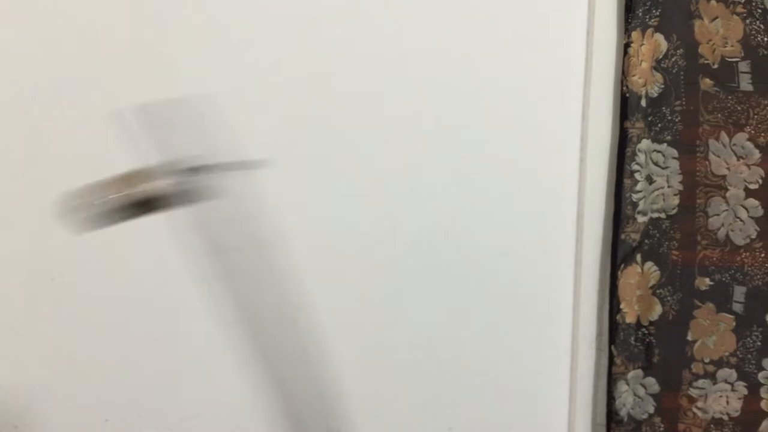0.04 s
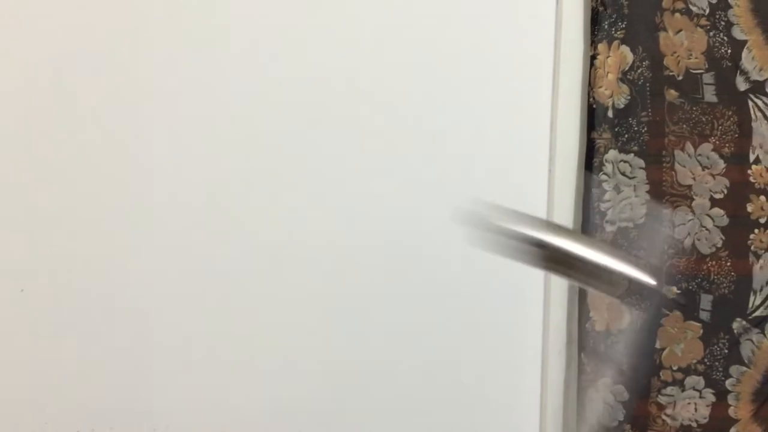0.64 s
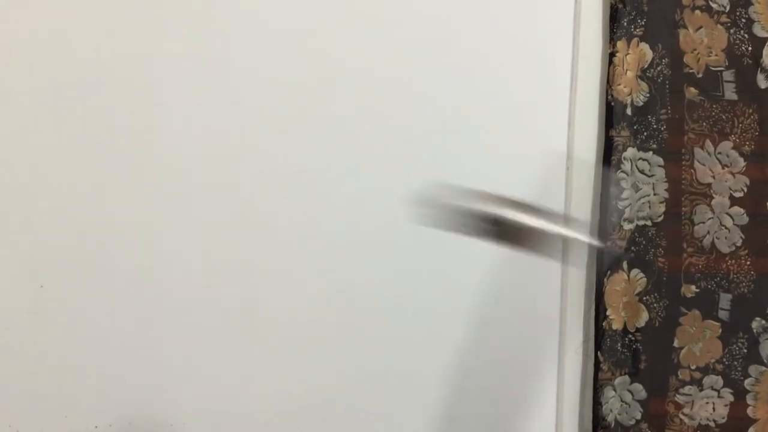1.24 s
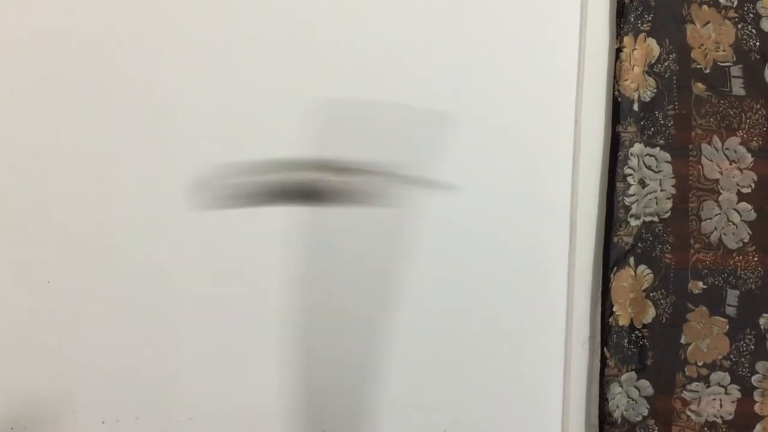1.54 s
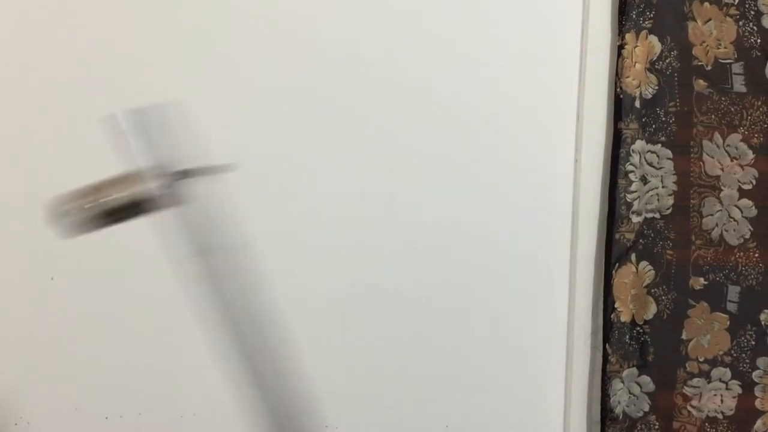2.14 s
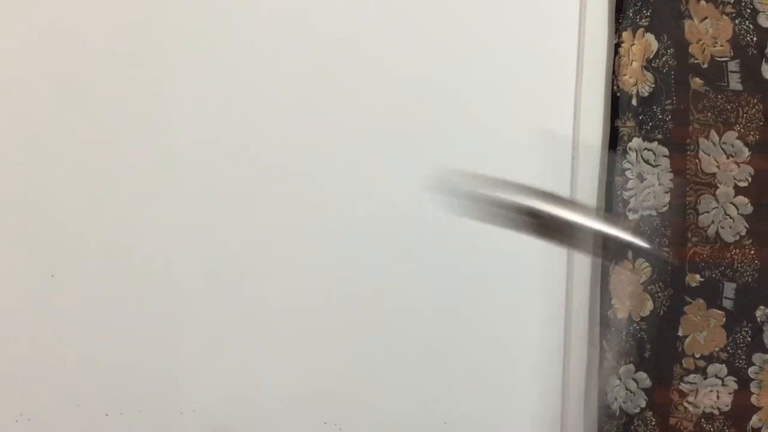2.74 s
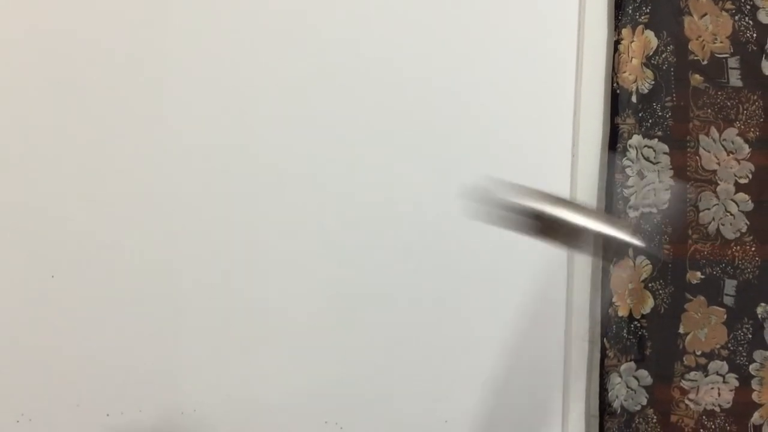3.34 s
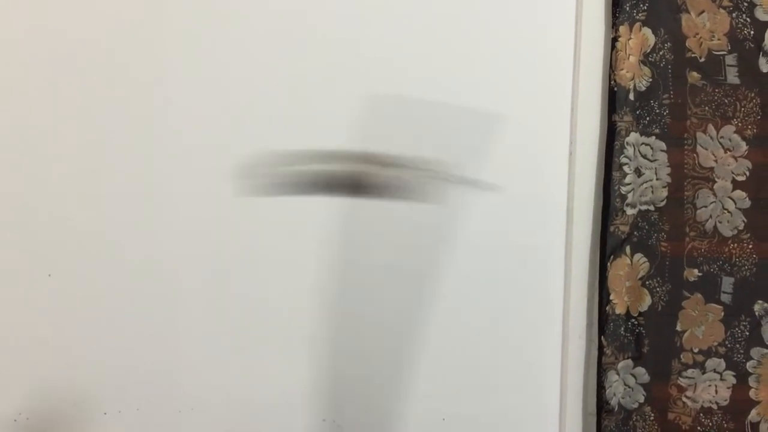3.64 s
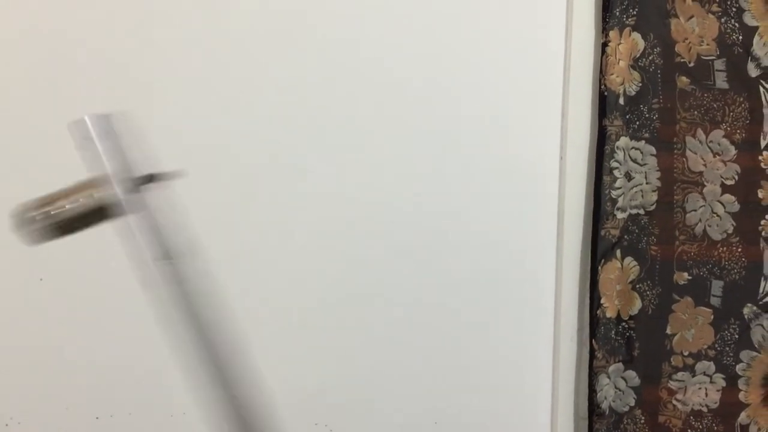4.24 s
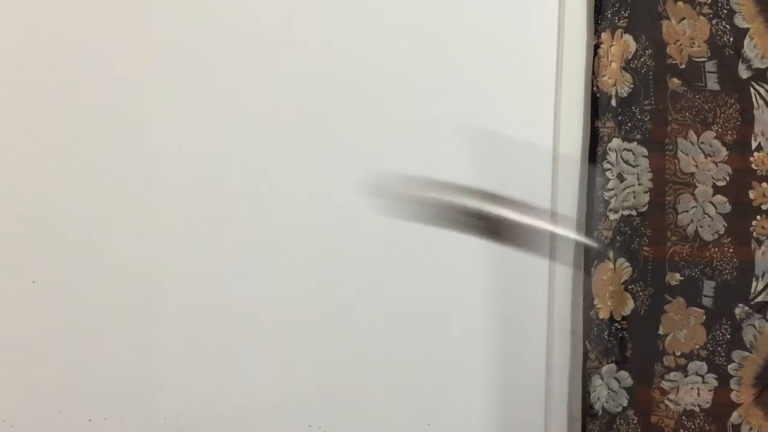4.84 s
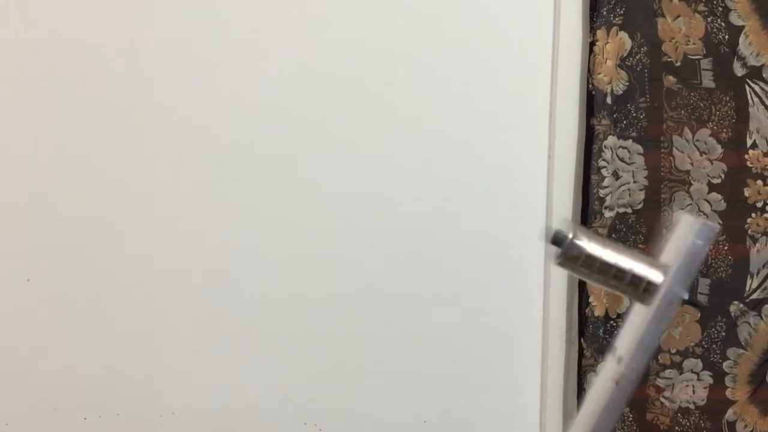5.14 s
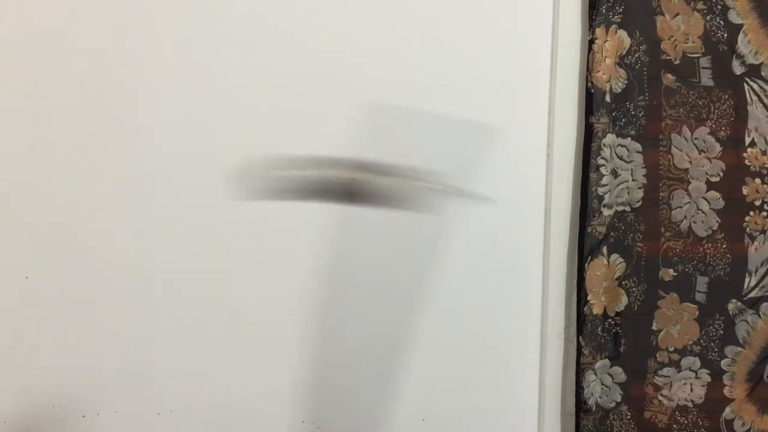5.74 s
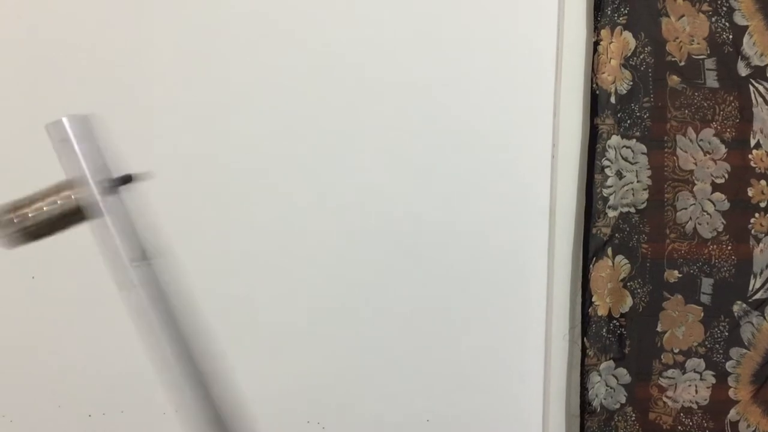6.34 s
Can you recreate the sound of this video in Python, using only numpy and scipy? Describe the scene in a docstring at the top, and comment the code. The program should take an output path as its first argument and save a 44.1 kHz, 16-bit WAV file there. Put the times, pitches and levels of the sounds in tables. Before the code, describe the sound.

Quick, regular metallic knocks and ticks from a loose, motor-driven crank and arm, over a steady hum and low rumble.

```python
"""A small electric motor swings a homemade crank and arm to and fro in a small room.
From the start the mains hum, the drive whirrs and the frame rumbles. Nearly four times a second the
slack pivot knocks and rebounds, a light contact ticks, and the loose link clacks and settles.
Midway a deeper rumble swells and sinks back; from there on the arm also scrapes briefly four times."""
import sys
import numpy as np
from scipy import signal
from scipy.fft import rfft, irfft, next_fast_len
from scipy.io import wavfile
from scipy.ndimage import uniform_filter1d

SR = 44100
rng = np.random.default_rng(int(sys.argv[2]) if len(sys.argv) > 2 else 0)


def store_pcm(level_fs):
    """Save levels as 16-bit WAV."""
    pcm = np.round(np.clip(level_fs, -1, 1) * 32767).astype(np.int16)
    wavfile.write(sys.argv[1], SR, np.atleast_2d(pcm).T)


N = 282240
TIME = np.arange(N) / SR
SIZE = next_fast_len(N + SR // 2)  # spare room for ringing to die away
FREQ = np.maximum(np.arange(SIZE // 2 + 1) * SR / SIZE, 1)
STROKE_S, FIRST_TICK_S = .26328, .1048  # a stroke runs from one tick to the next

# The pivot's knocks: (time [s], relative level [dB], extra low ring [dB], touch before the knock [dB])
KNOCK_PER_STROKE = [(.045, -35, 1, -40), (.297, -30, -3.5, -40), (.571, -37.5, -1, -43),
                    (.8226, -31.5, -4, -50), (1.100, -35, -3.5, -38), (1.3468, -31.5, -8.5, -47),
                    (1.628, -33, -5, -42), (1.8786, -31.5, 0.5, -41), (2.151, -36, -2, -37.5),
                    (2.411, -32.5, -6, -40), (2.673, -34, 0.5, -37), (2.940, -32, -4, -42),
                    (3.197, -32, -6, -46), (3.4685, -33.5, -2, -39), (3.7214, -29.5, -4.5, -50),
                    (3.997, -39, -1, -57), (4.243, -28.5, -6.5, -39), (4.525, -38.5, 1, -58),
                    (4.7694, -32, -3.5, -46), (5.050, -39, -0.5, -54), (5.298, -30.5, -6, -42),
                    (5.571, -33.5, -5, -56), (5.830, -30.5, -8, -46), (6.094, -32.5, -7.5, -47),
                    (6.358, -34, -6, -52)]


def undb(db):
    """Turn decibels into a gain."""
    return 10 ** (np.asarray(db) / 20)


def unit(x):
    """Scale to an average (rms) level of 1."""
    return x / np.sqrt(np.mean(x ** 2))


def steady(x, size):
    """Hold the level near 1 over every stretch of `size` samples."""
    return x / np.sqrt(uniform_filter1d(x ** 2, size))


def drift(rate_hz):
    """Smooth random wandering, about 1 up or down."""
    step = int(SR / rate_hz)
    stairs = np.repeat(rng.standard_normal(N // step + 1), step)
    return 1.3 * uniform_filter1d(stairs, step)[:N]


def stroke_starts():
    """When each stroke begins; the crank turns evenly."""
    return FIRST_TICK_S + STROKE_S * np.arange(len(KNOCK_PER_STROKE))


def once_a_stroke(at, width):
    """A smooth bump in every stroke; its place and width are shares of a stroke."""
    stroke = (TIME - FIRST_TICK_S) / STROKE_S
    distance = (stroke - at + .5) % 1 - .5
    return np.exp(-.5 * (distance / width) ** 2)


def spectrum(points):
    """Gain at each frequency, from a line through (frequency [Hz], level [dB]) points."""
    hz, db = np.transpose(points)
    return undb(np.interp(np.log(FREQ), np.log(hz), db))


def resonances(modes, skirt):
    """Gain peaks at a body's ringing notes (modes), falling faster beyond `skirt` times their pitch."""
    power = sum(undb(2 * db) / (1 + (2 * (FREQ - hz) / width) ** 2)
                / (1 + ((FREQ - hz) / (skirt * hz)) ** 2) for hz, width, db in modes)
    return np.sqrt(power)


def ring(x, gain):
    """Colour a sound with a gain curve; white noise keeps its level."""
    gain = unit(gain)
    # Folding the cepstrum puts all the ringing after a hit, none before it.
    cepstrum = irfft(np.log(gain + 1e-6), SIZE)
    cepstrum[1:SIZE // 2] *= 2
    cepstrum[SIZE // 2 + 1:] = 0
    response = np.exp(rfft(cepstrum))
    return irfft(rfft(x, SIZE) * response, SIZE)[:N]


def contacts(times, levels_db, chatter_s, room_db, room_s):
    """Each contact is a burst of noise that builds up and chatters; the room's echo trails after it."""
    out, t = np.zeros(N + SR), np.arange(SR // 3) / SR
    rise = 1 - np.exp(-t / .0012)
    shape = rise * np.hypot(np.exp(-t / chatter_s), undb(room_db) * np.exp(-t / room_s))
    for s, db in zip(times, levels_db):
        start = int(np.clip(s * SR, 0, N))
        out[start:start + len(t)] += undb(db) * shape * rng.standard_normal(len(t))
    return out[:N]


def repeats(s, db, low_ring_db, scatter_s, scatter_db):
    """Blows that are never quite alike: (time [s], level [dB], extra low ring [dB])."""
    chance = rng.standard_normal((len(s), 3)).T
    return np.column_stack([s + scatter_s * chance[0], db + scatter_db * chance[1],
                            low_ring_db + scatter_db * chance[2]])


def blows(rows, body, high_db, low_db, lag_s, **decay):
    """A struck body rings: its stiff high notes answer at once, its low bending notes a moment later."""
    s, db, low_ring_db = np.transpose(rows)
    low_share = 1 / (1 + (FREQ / 3450) ** 24)  # low and high part at 3450 Hz
    high = ring(contacts(s, db, **decay), body * np.sqrt(1 - low_share))
    low = ring(contacts(s + lag_s, db + low_ring_db, **decay), body * np.sqrt(low_share))
    return undb(high_db) * high + undb(low_db) * low


def motor():
    """The mains hum, bearings and gears whirr, and the crank groans softly as it takes the load."""
    # Hum tones: (frequency [Hz], level before swell and drift [dB])
    hum_tones = [(100, -52), (200, -63.5), (300, -56)]
    # Tone colour of the whirr: (frequency [Hz], relative level [dB])
    whirr_colour = [(190, -24.5), (330, -12), (589, -7), (813, -5), (1280, -8), (1410, -9.5), (1760, -8),
                    (2640, -10), (2900, -8.5), (3820, -12), (4140, -13), (5020, -22.5), (5620, -27),
                    (6710, -30.5), (15500, -38.5)]
    # Ringing notes of the motor housing: (frequency [Hz], width [Hz], relative level [dB])
    housing_modes = [(374, 66, 3), (660, 19, -0.5), (826, 14, -7), (1030, 42, 4), (1250, 14, 5),
                     (1621, 8.7, 8.5), (8300, 99, 2), (11050, 43, -17), (14700, 280, -2)]
    # Low notes of the loaded crank: (frequency [Hz], width [Hz], relative level [dB])
    groan_modes = [(415, 44, 2), (420, 22, -7.5)]
    swell_db = 2 * once_a_stroke(at=.92, width=.076)  # as the arm swings back
    hum = np.zeros(N)
    for hz, db in hum_tones:
        peak = np.sqrt(2) * undb(db + swell_db + 2 * drift(2.97))
        hum += peak * np.sin(2 * np.pi * (hz * TIME + rng.random()))
    housing = np.hypot(1, resonances(housing_modes, skirt=.022))
    whirr = unit(ring(rng.standard_normal(N), spectrum(whirr_colour) * housing))
    groan = unit(ring(rng.standard_normal(N), resonances(groan_modes, skirt=.11)))
    groan *= once_a_stroke(at=.533, width=.056)
    flutter_db = .42 * drift(5) + 1.3 * drift(60)
    return hum + undb(-49 + flutter_db) * whirr + undb(-56.5) * groan


def frame():
    """The drive shakes the frame, hardest as the arm swings back; a deeper rumble swells midway."""
    # Ringing notes of the frame: (frequency [Hz], width [Hz], relative level [dB])
    frame_modes = [(61.3, 3.5, -12), (81.9, 5.4, 0.5), (97.4, 6.5, -5), (113, 6.1, -6), (129, 7.3, -0.5),
                   (181.3, 7.2, -10), (191, 15, -20.5), (212.5, 10, -12), (233.2, 6, -13), (249, 26, -16.5),
                   (287.6, 14.7, -12), (334, 21, -21), (388, 25, -25)]
    # Tone colour of the deep rumble: (frequency [Hz], relative level [dB])
    deep_colour = [(10, -30), (28, -21), (42, -2), (54, 1), (70, -20), (200, -70)]
    # Rise and fall of the deep rumble: (time [s], relative level [dB])
    deep_levels = [(2.4, -66), (2.468, -75), (2.868, -47), (2.996, -55), (3.82, -56), (3.884, -78),
                   (4.05, -65)]
    push = rng.standard_normal(N) * (1 + .23 * once_a_stroke(at=.895, width=.075))
    rumble = steady(ring(push, resonances(frame_modes, skirt=.26)), size=SR // 7)
    rumble_db = -46.5 + 2.5 * once_a_stroke(at=.91, width=.26)
    deep = steady(ring(rng.standard_normal(N), spectrum(deep_colour)), size=SR // 5)
    deep_db = np.interp(TIME, *np.transpose(deep_levels)) - 4
    return undb(rumble_db) * rumble + undb(deep_db) * deep


def arm():
    """Once a stroke the slack pivot touches, knocks and grinds, and the arm rebounds more softly."""
    # Ringing notes of the arm: (frequency [Hz], width [Hz], relative level [dB])
    arm_modes = [(1430, 40, -10), (1625, 25, -9), (2000, 50, -7), (2237, 18, 1), (2320, 30, -6),
                 (2382, 32, 2), (2762, 36, -2), (2988, 28, -2), (3260, 60, -4), (3550, 80, -8),
                 (3750, 100, -9), (3897, 20, 0), (3992, 24, 2), (4030, 24, 0), (4125, 24, 0), (4202, 26, 4),
                 (4380, 26, 0), (4415, 26, 1), (4500, 40, -7), (4628, 40, -3), (4790, 40, -15),
                 (4980, 40, -15), (5190, 50, -16), (5420, 40, -13), (5733, 25, -12), (5900, 40, -16),
                 (6760, 120, -24), (7050, 120, -24), (9100, 900, -29), (12400, 2500, -29)]
    body = resonances(arm_modes, skirt=.082)
    s, db, low_ring_db, touch_db = np.transpose(KNOCK_PER_STROKE)
    touches = repeats(s - .019, touch_db, low_ring_db=-4.5, scatter_s=.0005, scatter_db=-1)
    bounces = repeats(s + .042, db=-39, low_ring_db=-2, scatter_s=.003, scatter_db=.5)
    hits = np.column_stack([s, db, low_ring_db])
    knocks = blows(np.vstack([hits, touches]), body, high_db=-.5, low_db=2, lag_s=.001972,
                   chatter_s=.0059, room_db=-19.5, room_s=.058)
    rebounds = blows(bounces, body, high_db=-6, low_db=-3, lag_s=.000942,
                     chatter_s=.0045, room_db=-4.5, room_s=.022)
    grind = ring(rng.standard_normal(N), body) * once_a_stroke(at=.89, width=.16)
    return knocks + rebounds + undb(-53.5) * grind


def ticks():
    """A tiny, very sharp contact once a stroke: one spike, then its echoes off nearby surfaces."""
    # Tone colour of a tick: (frequency [Hz], relative level [dB])
    tick_colour = [(2000, -8), (5000, 1), (6800, -1), (8000, -13), (11000, -7), (13000, 0), (14100, 4),
                   (15500, -2)]
    s = stroke_starts()
    s = s[s < TIME[-1]]
    db = -31.5 + rng.standard_normal(len(s))
    spike_samples = np.clip((s + .001) * SR, 0, N - 1).astype(int)
    spikes = np.zeros(N)
    spikes[spike_samples] = undb(db)
    echoes = contacts(s + .0018, db - 24, chatter_s=.0037, room_db=-4, room_s=.02)
    return ring(spikes + echoes, spectrum(tick_colour))


def link():
    """The link clacks after each tick, settles more softly, and trembles in its holes with faint taps."""
    # Ringing notes of the link: (frequency [Hz], width [Hz], relative level [dB])
    link_modes = [(1550, 200, -9), (2300, 200, -4), (2780, 40, 6), (2935, 45, 4), (3140, 60, 1),
                  (3700, 300, -4), (4150, 200, -3), (4480, 150, -3), (5080, 50, -2), (5410, 50, -1),
                  (5733, 35, -5), (6050, 250, -11), (9030, 130, -17), (12000, 3000, -27)]
    body = resonances(link_modes, skirt=.074)
    s = stroke_starts()
    knock_offset_s = np.transpose(KNOCK_PER_STROKE)[0] - s
    # Near -1 after an early knock, near +1 after a late one, which makes both clacks harder.
    late = np.tanh((knock_offset_s - knock_offset_s.mean()) / .0027)
    strikes = repeats(s + .0705, db=-43 + 3 * late, low_ring_db=-2, scatter_s=.0006, scatter_db=1.1)
    settles = repeats(s + .17, db=-53 + 5 * late, low_ring_db=3.5, scatter_s=.003, scatter_db=.8)
    clacks = blows(np.vstack([strikes, settles]), body, high_db=-3, low_db=1, lag_s=.0005,
                   chatter_s=.0073, room_db=-11.5, room_s=.036)
    when, strength = rng.random((130, 2)).T
    tap_db = -54.5 + 10 * strength ** 2  # most are faint, a few stronger
    taps = contacts(when * N / SR, tap_db, chatter_s=.005, room_db=-14, room_s=.03)
    return clacks + ring(taps, body)


def scrapes():
    """The arm grazes something with a short, bright rasp."""
    # The arm's grazes: (time [s], relative level [dB])
    grazes = [(2.7624, -58), (4.842, -59), (5.1217, -52.5), (6.1752, -53.5)]
    # Tone colour of the rasp: (frequency [Hz], relative level [dB])
    rasp_colour = [(1000, 4), (2400, -2), (4200, 11), (6500, 0.5), (8800, 2), (11000, -10), (15000, -25)]
    s, db = np.transpose(grazes)
    rubbing = contacts(s, db + 10, chatter_s=.016, room_db=-12, room_s=.04)
    return ring(rubbing, spectrum(rasp_colour))


def scene():
    """All parts of the machine, heard close up in one channel."""
    return (motor() + frame() + arm() + ticks() + link() + scrapes())[None]


def record(dry):
    """A steep filter cuts the highest treble, above 15250 Hz."""
    return signal.sosfilt(signal.ellip(10, .2, 70, 15250, fs=SR, output="sos"), dry)


dry = scene()
out = record(dry)
store_pcm(out)
```